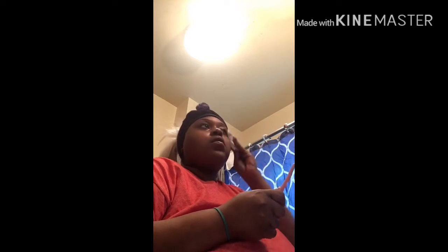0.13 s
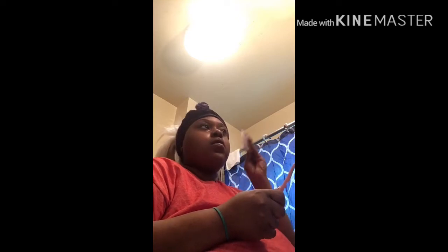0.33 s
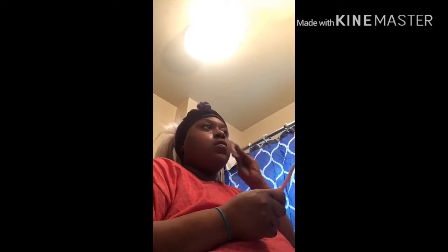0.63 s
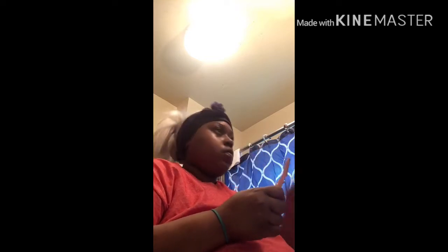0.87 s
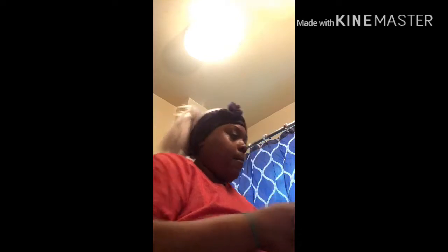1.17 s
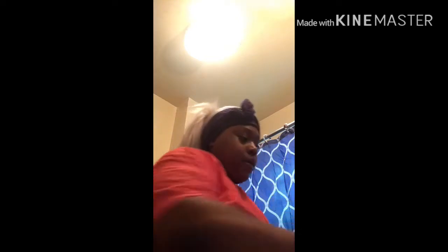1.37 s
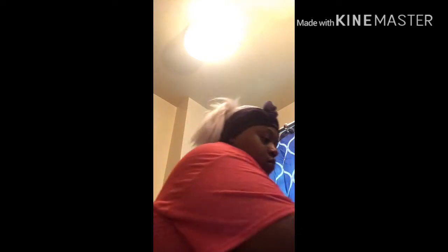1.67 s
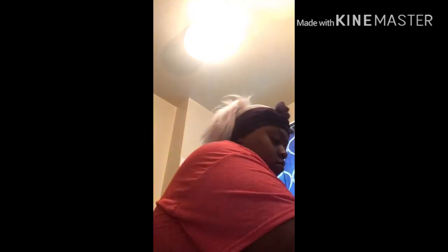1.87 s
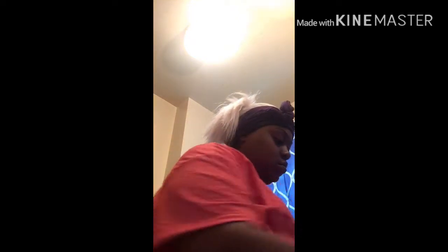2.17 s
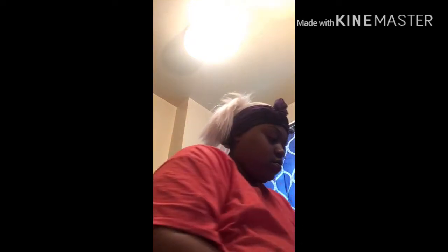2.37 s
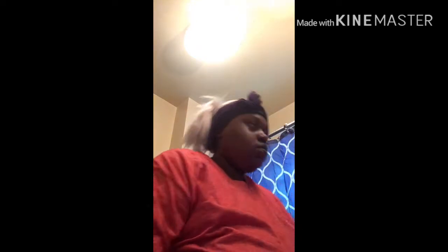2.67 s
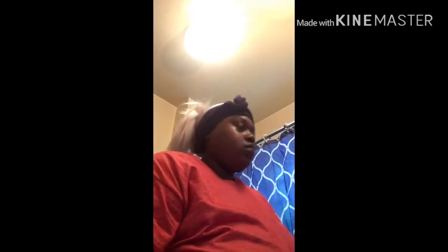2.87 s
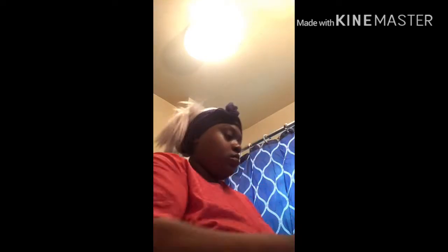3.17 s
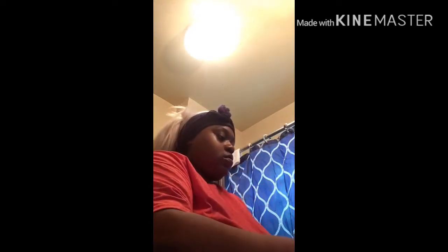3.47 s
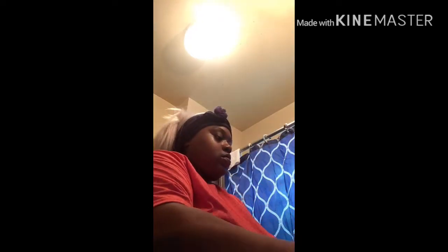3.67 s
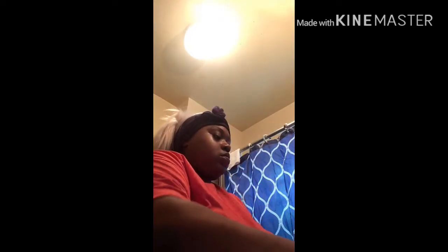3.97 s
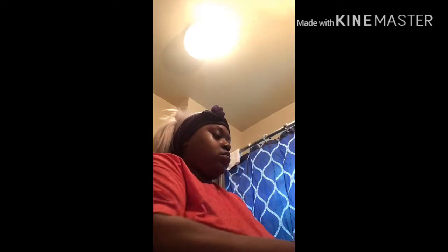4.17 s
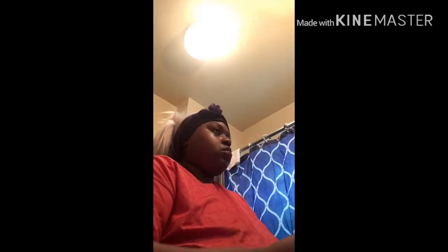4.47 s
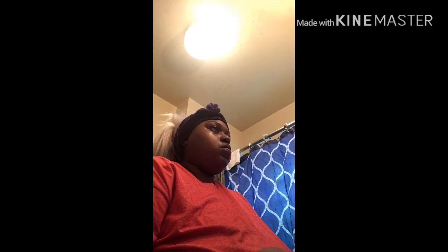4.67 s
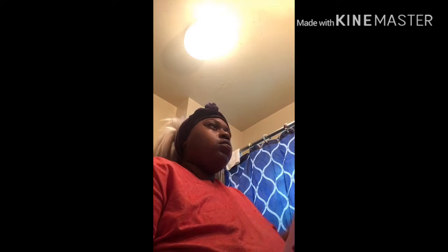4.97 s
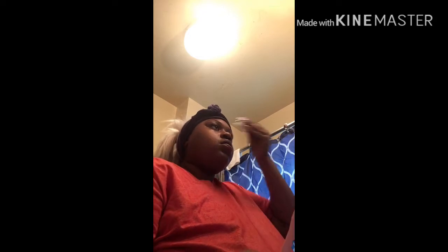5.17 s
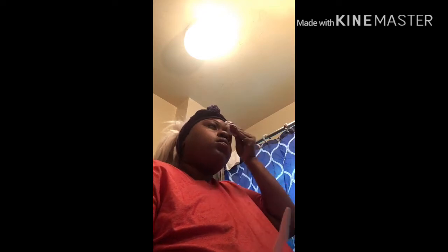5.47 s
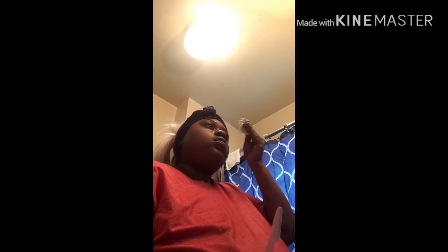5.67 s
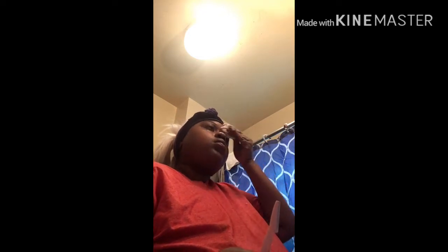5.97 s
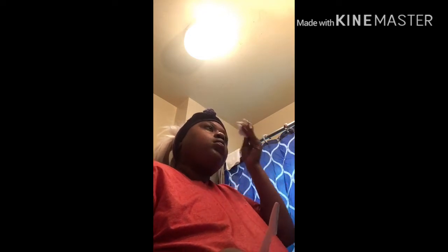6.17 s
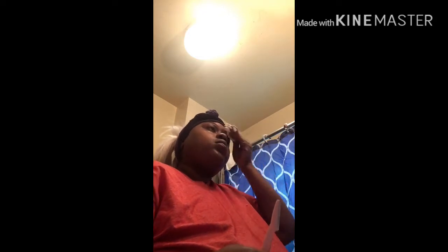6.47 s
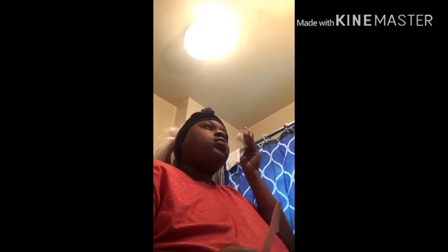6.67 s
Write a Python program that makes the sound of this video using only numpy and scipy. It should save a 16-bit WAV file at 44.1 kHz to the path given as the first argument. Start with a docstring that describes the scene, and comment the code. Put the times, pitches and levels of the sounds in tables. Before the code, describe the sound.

In a small tiled bathroom, hair is brushed twice, cloth rustles, then a rattly flush handle releases a close, hissing, bubbling rush of water.

```python
"""Two strokes of a hair brush, close by in a small tiled bathroom, then two rustles of clothes and a soft bump.
A toilet is flushed: the lever clacks and rings in a few rattling modes, the fill valve opens to a steady hiss.
Brush, rustles, hiss and rim spray are streams of tiny random impacts, each with its own colour.
The siphon takes hold: bubbles ring the hollow of the bowl, and gulps of air sound as wobbling sine pulses.
A low rumble of filtered noise lies beneath; splashes snap on top as short noise bursts with a ringing bubble."""
import sys
import numpy as np
from scipy import signal
from scipy.io import wavfile
from scipy.ndimage import uniform_filter1d

SR = 44100
rng = np.random.default_rng(int(sys.argv[2]) if len(sys.argv) > 2 else 0)


def digitize_waveform(pressure):
    """Quantize a signal to 16-bit integers and store it at the path in sys.argv[1].

    Rows of a 2-D input are taken as channels; values are limited to [-1, 1].
    """
    field = np.atleast_2d(pressure).T
    bounded = np.clip(field, -1, 1)
    quanta = np.round(bounded * 32767).astype(np.int16)
    wavfile.write(sys.argv[1], SR, quanta)


N = 300321
TIME = np.arange(N) / SR
HZ = np.fft.rfftfreq(16384, 1 / SR)

# the fill valve opens and stays open: (time [s], level of the top of its hiss [dB])
VALVE = [(1.96, -80), (2.046, -56), (2.058, -48), (2.084, -49.5), (2.2, -54), (2.5, -49.5), (6.81, -50)]
# pull of the siphon, behind the churn and the rumble of the trap: (time [s], pull [dB re a strong pull])
SIPHON = [(2.1, -52), (2.38, -22.5), (2.76, -27), (2.92, 1), (3.2, -5.5), (4.1, 3), (4.33, -0.5),
          (4.7, -2.5), (5.42, -5.5), (5.6, -8), (5.93, 0), (6.13, -5), (6.65, 3.5), (6.81, -22)]


def amp(db):
    """Decibels to gain."""
    return 10 ** (np.asarray(db) / 20)


def evened(x):
    """Scales to an rms of one."""
    return x / np.sqrt(np.mean(x ** 2) + 1e-20)


def peaked(x, db):
    """Scales to a peak level."""
    return amp(db) * x / (abs(x).max() + 1e-20)


def read(points, hz):
    """Reads a table along log frequency."""
    f, value = np.transpose(points)
    return np.interp(np.log(hz + 1), np.log(f + 1), value)


def level(rows):
    """Gain over time from a curve, silent before it starts."""
    return amp(np.interp(TIME, *np.transpose(rows), left=-900))


def band(lo_hz, hi_hz):
    """Gain curve of a steep pass band."""
    return 1 / np.sqrt((1 + (lo_hz / (HZ + 1)) ** 16) * (1 + (HZ / hi_hz) ** 16))


def response(gain):
    """The causal, minimum-phase impulse response of a gain curve, scaled to a highest gain of one."""
    log_gain = np.log(np.maximum(gain / gain.max(), 1e-5))
    circle = np.concatenate([log_gain, log_gain[-2:0:-1]])
    spectrum = np.exp(np.conj(signal.hilbert(circle)))
    return np.fft.ifft(spectrum).real[:len(HZ)]


def colour(x, gain):
    """Passes a sound through a body with this gain curve."""
    return signal.oaconvolve(x, response(gain))[:len(x)]


def add(mix, s, sound):
    """Mixes a sound in at time s."""
    part = mix[round(s * SR):][:len(sound)]
    part += sound[:len(part)]


def burst(decay, tail_db=-60, tail=.02):
    """A puff of pressure that dies within a few decay times [s], with a spatter of another decay behind it."""
    t = TIME[:len(HZ)]
    envelope = np.exp(-t / decay) + amp(tail_db) * np.exp(-t / tail)
    return rng.standard_normal(len(t)) * envelope


def grains(per_s, spread_db):
    """Random tiny impacts, most small and a few large."""
    size = amp(spread_db * np.minimum(rng.exponential(1, N), 4.5))
    sign = rng.choice([-1., 1.], N)
    strikes = rng.random(N) < per_s / SR
    return evened(size * sign * strikes)


def flutter(depth_db, span):
    """A gain that wanders at random over about span seconds, by depth_db rms."""
    size = max(int(span * SR), 2)
    wander = uniform_filter1d(uniform_filter1d(rng.standard_normal(N), size), size)
    return amp(depth_db * evened(wander))


def room(x, wet_db):
    """Adds dense reflections from the tiles, each band dying at its own speed."""
    # decay of the reflections: (frequency [Hz], time to fall 60 dB [s])
    tiles = [(200, 0.17), (800, 0.17), (2100, 0.3), (5500, 0.15), (14000, 0.14)]
    taps = rng.choice([-1., 1.], SR // 2) * (rng.random(SR // 2) < .1)
    taps *= TIME[:SR // 2] > .004  # the first reflections come after 4 ms
    hz, t, z = signal.stft(taps, SR, nperseg=256)
    decay = amp(-60 * t / read(tiles, hz)[:, None])
    tail = signal.istft(z * decay, SR, nperseg=256)[1]
    return x + amp(wet_db) * signal.fftconvolve(x, tail / np.linalg.norm(tail))[:N]


def walls(x, echo_db, count=14):
    """The nearest walls and the porcelain return a few early echoes, 2 to 20 ms late, that comb the sound."""
    taps = np.zeros(SR // 50)
    taps[rng.integers(SR // 500, len(taps), count)] = rng.choice([-1., 1.], count)
    return x + amp(echo_db) * signal.oaconvolve(x, taps / np.sqrt(count))[:N]


def plink(hz, cycles=11, rise=0.023):
    """A tiny bubble, its pitch rising as it nears the surface, dies to 1/e in some cycles."""
    age = TIME[:SR // 40] * hz / cycles  # in decay times
    tone = np.sin(2 * np.pi * cycles * age * (1 + rise * age / 2))
    return tone * np.exp(-age) * (1 - np.exp(-4 * age))


def porcelain():
    """Gain curve of the hard bowl in the treble: resonances over a flat floor."""
    # resonances of the porcelain: (frequency [Hz], half width [Hz], level re the floor [dB])
    modes = [(3517, 30, 7.5), (4030, 72, -5), (4590, 45, 8.5), (5860, 22, -6), (6170, 51, 0)]
    return 1 + sum(amp(db) / (1 + ((HZ - hz) / width) ** 2) for hz, width, db in modes)


def hollow(floor_db=-38):
    """Gain curve of the air in the bowl: resonances over a weak floor."""
    # resonances of the enclosed air: (frequency [Hz], half width [Hz], level [dB])
    modes = [(138, 4, -21), (170, 9.7, -5), (205.2, 3.8, -9.5), (277.3, 13, 0.5), (328, 10.4, -12.5),
             (386.4, 18, -13), (446, 14, -20), (546.3, 3.6, -11.5), (645.5, 8.4, 1), (918.6, 6.4, 2),
             (958, 8.8, -6), (989.5, 18.7, -4.5), (1093, 12, -7.5), (1259, 6, -13), (1356, 6.9, -18),
             (1470, 22.5, -7.5), (1540, 37, -16), (1680, 6.9, -10.5), (1848, 6.9, -6.5), (1916, 7.5, -5),
             (1974, 8, -23.5), (2064, 21, -17), (2242, 24, -15.5), (2354, 3.6, -13.5)]
    return amp(floor_db) + sum(amp(db) / (1 + ((HZ - hz) / width) ** 2) for hz, width, db in modes)


def still_air(air_db=-64, hum_hz=64, hum_width_hz=5, hum_db=-66):
    """Faint room noise with a low, wavering hum: noise through a narrow resonance."""
    # colour of the still room: (frequency [Hz], level per Hz [dB])
    air = [(15, -43), (25, -4), (48, -9.5), (72, -2), (170, -8), (461, -19), (654, -18.5), (791, -20.5),
           (4450, -30.5), (7030, -32), (10500, -40), (14600, -36), (15800, -49)]
    hum = colour(rng.standard_normal(N), 1 / (1 + ((HZ - hum_hz) / hum_width_hz) ** 2))
    hum = np.roll(hum, N // 2)  # already sounding at the start
    noise = colour(rng.standard_normal(N), amp(read(air, HZ)))
    return amp(air_db) * evened(noise) + amp(hum_db) * evened(hum)


def drain(drain_db=-56.5, follow=0.16, tilt_db=7):
    """Water tumbling down the trap gives a lumpy low rumble, stronger by tilt_db an octave upwards."""
    gain = band(88, 171) * amp(tilt_db * np.log2(HZ + 1))
    rumble = colour(rng.standard_normal(N), gain) * flutter(depth_db=4.0, span=0.39)
    return amp(drain_db) * level(SIPHON) ** follow * evened(rumble)  # follow: dB per dB of siphon


def brush_and_clothes(body_db=0.8, fizz_db=-1):
    """Bristles on hair, then clothes, slip in tiny flicks; each movement lands, swells mid-way and lifts off."""
    # two brush strokes, then two rustles of clothes:
    # (time [s], length [s], level before swell and trim [dB], fine fizz before arch and trim [dB])
    movements = [(0.109, 0.22, -60.5, -58), (0.591, 0.14, -60.5, -59), (1.098, 0.18, -68.5, -58.5),
                 (1.468, 0.14, -69, -71)]
    # colour of the flicks: (frequency [Hz], level per Hz [dB])
    flick_colour = [(350, -39), (600, -7), (845, -33), (892, -14), (1290, -5.5), (2740, 0.5), (3370, -2.5),
                    (4310, -0.5), (8190, -23), (15800, -29.5)]
    attack_s, release_s, swell_db, arch_db = 0.0091, 0.055, 5, 11
    rustle_from_s, rustle_db, rustle_fizz_db = 0.64, -72.5, -74  # levels before trim

    flicks = grains(per_s=8900, spread_db=1.5) * flutter(depth_db=0.7, span=0.0088)
    gain = amp(read(flick_colour, HZ))
    # faint rustling goes on from 0.64 s
    moving = np.clip((TIME - rustle_from_s) / release_s, 0, 1)
    body, fizz = amp(rustle_db) * moving, amp(rustle_fizz_db) * moving
    for s, length, db, fine_db in movements:
        t = TIME - s
        contact = np.clip(t / attack_s, 0, 1) * np.exp(-np.maximum(t - length, 0) / release_s)
        speed = np.sin(np.pi * np.clip(t / (length + 2 * release_s), 0, 1))
        body = np.hypot(body, amp(db + swell_db * (speed - 1)) * contact)
        fizz = np.hypot(fizz, amp(fine_db + arch_db * (speed - 1.5)) * contact)
    body = amp(body_db) * body * evened(colour(flicks, gain * band(640, 5100)))
    fizz = amp(fizz_db) * fizz * evened(colour(flicks[::-1], gain * band(5850, 18000)))
    return (body + fizz) * (TIME < VALVE[0][0])  # silent once the valve's curve begins


def knock(hz, octaves=0.85):
    """Gain curve of a dull, soft blow centred on one pitch."""
    return band(0.35 * hz, 8.2 * hz) / (1 + (np.log2((HZ + 1) / hz) / octaves) ** 2)


def thump(hz, ring_s=0.0063, puff_db=1, body_db=-4):
    """A soft blow: a dull puff over a few cycles of low body, their levels relative to each other."""
    t = TIME[:len(HZ)]
    body = np.sin(2 * np.pi * hz * t) * (1 - np.exp(-t * hz)) * np.exp(-t / ring_s)
    puff = colour(burst(decay=0.027), knock(hz))
    return peaked(puff, puff_db) + peaked(body, body_db)


def handling(tap_db=-2):
    """Soft bumps of a body turning round, a sleeve brushing past and dry taps, all short puffs of noise or body."""
    # soft bumps: (time [s], peak before the room [dB], pitch [Hz])
    bumps = [(1.112, -42, 247), (1.15, -48, 116)]
    # the sleeve: (time [s], peak before the room [dB])
    sleeve = [(1.481, -51.5)]
    # colour of the cloth: (frequency [Hz], level per Hz [dB])
    cloth = [(100, -19), (450, 1), (1000, -7), (1600, -5), (2300, -12), (6000, -30)]
    # the brush landing and the valve cracking open: (time [s], peak before trim and room [dB])
    taps = [(0.119, -55), (0.6, -45), (2.056, -30.5)]
    out = np.zeros(N)
    for s, db, hz in bumps:
        add(out, s, peaked(thump(hz), db))
    for s, db in sleeve:
        add(out, s, peaked(colour(burst(decay=0.033), amp(read(cloth, HZ))), db))
    for s, db in taps:
        add(out, s, peaked(colour(burst(decay=0.01), band(2300, 7500)), db + tap_db))
    return room(out, wet_db=-6)


def fill_valve():
    """Mains water hisses through the narrow valve into the tank: dense tiny impacts with early echoes."""
    # colour of the hiss: (frequency [Hz], level per Hz [dB])
    hiss = [(150, -45.5), (260, -3), (379, -11), (535, -13.5), (692, -9), (1030, -16), (1500, -0.5),
            (2100, -7), (2560, -7), (2880, -12), (4280, -4.5), (4750, -11), (6930, -9), (8080, -11.5),
            (9800, -12), (10450, -15.5), (11000, -11), (14500, -14), (15800, -14)]
    jet = walls(colour(grains(per_s=20000, spread_db=4.0), amp(read(hiss, HZ))), echo_db=-8.5)
    top = np.std(colour(jet, band(8000, 15000)))  # the part whose level the valve curve gives
    return level(VALVE) * jet / top * flutter(depth_db=1.37, span=0.0054)


def lever(clack_db=-4, ring_db=-15, ring_rise_s=0.0018, rattle_hz=26):
    """The lever clacks against its stop; it sits loose, so its brief ring is smeared by rattling."""
    # the flush lever: (time [s], peak before trims and room [dB])
    strikes = [(1.847, -24)]
    # its ringing: (frequency [Hz], relative level [dB], time to fall 60 dB [s])
    modes = [(585, -17, 0.12), (1460, -6, 0.19), (1980, -13, 0.16), (2640, 1, 0.07), (3070, -7, 0.21),
             (3090, -1, 0.13), (3640, -10, 0.11)]
    # colour of the clack: (frequency [Hz], level per Hz [dB])
    clack_colour = [(180, -41), (550, -7), (1200, -13), (1500, -5.5), (2000, -0.5), (2400, -8), (2700, 0),
                    (3100, 4.5), (3350, -6), (4000, -10), (5800, -6), (6600, -11), (7300, -13),
                    (15800, -23)]
    out, t = np.zeros(N), TIME[:len(HZ)]
    ring = np.zeros(len(t))
    for hz, db, t60 in modes:
        pitch = hz + rattle_hz * evened(uniform_filter1d(rng.standard_normal(len(t)), size=150))
        ring += amp(db - 60 * t / t60) * np.sin(2 * np.pi * np.cumsum(pitch) / SR)
    ring *= 1 - np.exp(-t / ring_rise_s)
    clack = colour(burst(decay=0.0044, tail_db=-11, tail=0.036), amp(read(clack_colour, HZ)))
    for s, db in strikes:
        add(out, s, peaked(clack, db + clack_db) + peaked(ring, db + ring_db))
    return room(out, wet_db=-7)


def rim_spray(wash_db=-3.0, drops_db=-7):
    """Rim jets patter on porcelain: a wash, and a fine crackle of droplets that ring briefly at 24 pitches."""
    # flow from the jets: (time [s], level before the wash and drops trims [dB])
    flow = [(2.18, -51), (2.25, -46), (2.48, -43), (2.76, -41.5), (2.95, -40), (3.3, -44), (3.55, -39.5),
            (3.75, -43), (4.0, -40.5), (4.38, -44), (4.7, -41.5), (5.3, -43), (6.81, -43.5)]
    # colour of the spray: (frequency [Hz], level per Hz [dB])
    spray_colour = [(1290, -34), (2200, -1), (2500, -28), (2690, 2), (3320, 3.5), (3460, -8.5), (3760, -1),
                    (4090, 3.5), (4600, -0.5), (4930, 0), (6100, 2.5), (6700, -8), (9000, -27),
                    (11700, -28), (19800, -120)]
    wash = colour(grains(per_s=5500, spread_db=1.5), amp(read(spray_colour, HZ)) * porcelain())
    wash = wash * flutter(depth_db=4.5, span=0.0092)
    drops = np.zeros(N)
    for hz in np.geomspace(3200, 6600, 24):
        ringing = signal.oaconvolve(grains(per_s=38, spread_db=4.0), plink(hz, cycles=3.2))[:N]
        drops += ringing * amp(read(spray_colour, hz))
    wash = amp(wash_db) * evened(walls(wash, echo_db=4))
    drops = amp(drops_db) * evened(colour(drops, porcelain()))
    return level(flow) * (wash + drops)


def churn(drift_depth=0.001486, pop_damping=0.086, surge_s=0.042):
    """Countless bubbles ring the bowl, surging with the siphon under a froth of small ones."""
    # bubble sizes, large to small: (lowest [Hz], highest [Hz], level at 0 dB of siphon [dB],
    # follow [dB per dB of siphon], depth of the random surges [dB])
    bubbles = [(149, 645, -41.5, 0.53, 2.4), (518, 778, -47, 0.57, 5), (810, 1110, -49, 0.3, 2.5)]
    # froth of small bubbles: (time [s], level [dB])
    froth = [(2.05, -68), (2.065, -51), (2.22, -49.5), (2.25, -46.5), (2.33, -49.5), (2.76, -52.5),
             (2.93, -39.5), (3.05, -54), (3.3, -44), (3.85, -45), (4.24, -42.5), (4.4, -48.5), (5.0, -46.5),
             (5.45, -44), (5.65, -52), (6.0, -43), (6.15, -48), (6.6, -44), (6.81, -48)]
    # the pitches drift slightly at random; drift_depth is the rms fraction
    drift = np.cumsum(drift_depth * evened(uniform_filter1d(rng.standard_normal(N), size=2500))) / SR

    def bubbling(lo_hz, hi_hz, depth):
        """Pops in one range of sizes, ringing more the deeper they lie; the pitches drift slightly at random."""
        ring = response(hollow() ** depth * band(lo_hz, hi_hz)) * np.exp(-TIME[:len(HZ)] / pop_damping)
        pops = signal.oaconvolve(grains(per_s=600, spread_db=1.5), ring)[:N]
        return np.interp(TIME + drift, TIME, pops)

    small = bubbling(1310, 2700, depth=0.79) * flutter(depth_db=2.5, span=0.03)
    out = level(froth) * evened(small)
    for lo_hz, hi_hz, db, follow, surge_db in bubbles:
        surging = bubbling(lo_hz, hi_hz, depth=0.94) * flutter(surge_db, surge_s)
        out += amp(db) * level(SIPHON) ** follow * evened(surging)
    return out


def splashes(trim_db=-4.5, octaves=0.91, plink_db=-5, spit_db=-2, spatter_db=-2, slap_db=-11, slap_hz=2130):
    """Water slaps shut: a snap, a spatter, a ringing bubble, a spit of fine drops; hard ones smack the porcelain."""
    # splashes: (time [s], level before trims [dB], pitch [Hz], level of the fine spit before trim [dB])
    rows = [(2.242, -29.5, 4470, -46), (2.281, -26, 4500, -46), (2.335, -27, 3880, -54),
            (2.361, -24.5, 4350, -53), (2.4105, -23.5, 4400, -32), (2.454, -19.5, 4400, -44),
            (2.527, -28, 4200, -50), (2.685, -22, 4400, -62), (2.829, -22, 4350, -39),
            (2.471, -24, 6460, -37), (2.605, -30.5, 5930, -34), (3.021, -28, 4230, -59),
            (3.105, -26, 4050, -35), (3.203, -32, 3900, -51), (3.298, -26, 4300, -50),
            (3.408, -24.5, 4100, -51), (3.5121, -16, 4370, -35), (3.603, -26, 4090, -35),
            (3.8055, -21, 3880, -47), (3.793, -36, 6100, -52), (3.972, -17, 5900, -40),
            (4.117, -21, 3930, -49), (4.1447, -30, 4220, -56), (4.2063, -25, 3800, -33),
            (4.624, -24, 4160, -52), (4.6777, -24, 4560, -47), (4.7585, -29, 3400, -44),
            (4.818, -39, 6140, -54), (4.8326, -14, 4330, -36), (5.5266, -25, 5900, -38),
            (5.7335, -36, 4700, -28), (5.956, -23, 6100, -45), (6.2746, -29.5, 3700, -40),
            (6.476, -23, 5950, -36), (6.6092, -16.5, 4330, -39)]
    out, hardest_db = np.zeros(N), max(row[1] for row in rows)
    for s, db, hz, fine_db in rows:
        gain = porcelain() * band(2800, 7200) / (1 + (np.log2((HZ + 1) / hz) / octaves) ** 2)
        snap = colour(burst(decay=0.0021), gain)
        spatter = colour(burst(decay=0.012), gain)
        spit = colour(burst(decay=0.01), band(7800, 11400))
        smack = colour(burst(decay=0.0044), 1 / (1 + ((HZ - slap_hz) / 450) ** 2))
        add(out, s, peaked(snap, db + trim_db))
        add(out, s, peaked(spatter, (db + fine_db) / 2 + spatter_db))
        add(out, s, peaked(plink(hz, cycles=5.4), db + plink_db))
        add(out, s, peaked(spit, fine_db + spit_db))
        add(out, s, peaked(smack, db + slap_db + 4.0 * (db - hardest_db)))  # fades fast in softer splashes
    return room(out, wet_db=-5.0)


def glug(hz, glide_per_s, wobble=0.024, size_spread=0.17):
    """A large bubble swells and dies at its own pitch, wobbling in shape; the pitch glides a little up or down."""
    swell_s, usual_ring_s = 0.0041, 0.016
    t = TIME[:len(HZ)]
    ring_chance, glide_chance = rng.uniform(-1, 1, 2)
    ring_s = usual_ring_s * np.exp(size_spread * ring_chance)
    glide = glide_per_s * glide_chance
    shape = wobble * evened(uniform_filter1d(rng.standard_normal(len(t)), size=300))
    pitch = hz * (1 + glide * (t - ring_s) + shape)
    return np.sin(2 * np.pi * np.cumsum(pitch) / SR) * (1 - np.exp(-t / swell_s)) * np.exp(-t / ring_s)


def gulps(pocket_trim_db=-3, shed_trim_db=-3, slop_db=-1.0, slop_growth=0.18, pop_db=-1.5, pop_octaves=0.22):
    """Air gulps through the trap: a pocket rings, sheds a bubble and slops the water; clusters burst on top."""
    # gulps: (time [s], level of the air pocket before trim [dB], level of the bubble it sheds before trim [dB],
    # pitch of the pocket [Hz], pitch of the bubble [Hz])
    glugs = [(2.477, -22.5, -31.5, 313, 642), (2.495, -25.5, -46, 298, 656), (2.575, -29, -36, 306, 648),
             (2.605, -24.5, -42, 276, 674), (2.624, -18.5, -49, 282.5, 626), (2.666, -38, -45, 277.3, 690),
             (2.681, -26, -51, 294, 677), (2.861, -26, -31, 307, 612), (2.88, -22.5, -31, 308, 652),
             (2.902, -34, -35, 277, 643), (2.931, -31.5, -39, 310, 650), (2.958, -30, -62, 280, 640),
             (2.971, -52, -29.5, 300, 664), (2.991, -27, -57, 286, 640), (3.047, -32, -56, 282, 684),
             (3.139, -29, -29, 297, 646), (3.151, -36, -35, 269, 672), (3.173, -34.5, -48, 258, 644),
             (3.322, -29, -37, 262, 610), (3.341, -29.5, -36, 274, 680), (3.371, -26.5, -21.5, 288, 635),
             (3.405, -36, -52, 272, 690), (3.442, -25, -43, 278, 630), (3.534, -29, -32.5, 272, 646),
             (3.568, -28, -28.5, 298, 641.5), (3.629, -30, -53, 275, 630), (3.68, -22.5, -27, 288, 649),
             (3.696, -34, -40, 295, 630), (3.741, -24, -40, 276, 647), (3.79, -31.5, -28, 277, 656),
             (3.854, -26.5, -45, 270.5, 615), (3.946, -22, -43, 280, 638), (3.97, -23, -43, 295, 620),
             (4.032, -24, -39, 307, 596), (4.057, -25, -24, 279, 640), (4.069, -43, -21.5, 304, 640),
             (4.345, -30.5, -38, 279, 650), (4.396, -38, -31, 276, 657), (4.468, -32, -28.5, 294, 665),
             (4.503, -30, -36, 307, 615), (4.528, -36, -27.5, 290, 652), (4.679, -35, -27.5, 323, 640),
             (4.724, -35, -48, 287, 676), (4.831, -29.5, -28.5, 325, 665), (4.878, -35, -34, 290, 630),
             (4.981, -26, -64, 313, 663), (5.072, -32.5, -34.5, 313, 644), (5.153, -28.5, -31, 301, 653),
             (5.175, -33, -32, 342, 625), (5.258, -55, -33, 320, 644), (5.35, -53, -30.5, 260, 643),
             (5.401, -26, -34.5, 278, 666), (5.528, -27.5, -65, 285, 676), (5.751, -41, -31, 277, 660),
             (5.851, -49, -33, 285, 649), (5.892, -26.5, -34, 323, 662), (5.919, -52, -32, 338, 658),
             (5.961, -34.5, -32, 310, 644), (6.229, -29.5, -44, 281, 680), (6.274, -28.5, -33, 304, 659),
             (6.386, -30.5, -39, 259, 638), (6.419, -41, -32, 260, 653), (6.453, -34, -31, 330, 667),
             (6.469, -51, -23.5, 310, 656), (6.521, -28.5, -49, 333, 680), (6.533, -44, -34, 328, 648),
             (6.563, -56, -24, 303, 654), (6.673, -48, -31.5, 318, 650), (6.693, -31, -32, 331, 676),
             (6.727, -29, -46, 326, 650)]
    # small bubbles bursting in clusters at the surface: (time [s], level before trim [dB], pitch [Hz])
    pops = [(2.469, -29.5, 930), (2.4686, -23.5, 1450), (2.49, -33, 1860), (2.62, -23.5, 1940),
            (2.622, -34, 2200), (2.624, -31.5, 1530), (2.816, -44.5, 980), (2.877, -30.5, 920),
            (2.915, -32, 1860), (2.965, -38, 935), (3.087, -30, 1500), (3.09, -38, 1820),
            (3.139, -29.5, 1810), (3.142, -34, 920), (3.168, -32, 945), (3.266, -37, 1540),
            (3.318, -30, 2270), (3.371, -24, 964), (3.399, -35, 1040), (3.515, -34, 1520),
            (3.684, -32, 1440), (4.058, -24.5, 1010), (4.06, -26.5, 1460), (4.191, -31, 1600),
            (4.215, -30, 1800), (4.686, -32.5, 1020), (4.764, -33, 970), (4.88, -33.5, 1480),
            (5.136, -30.5, 970), (5.14, -31, 1610), (5.388, -33, 970), (5.439, -31.5, 1950),
            (5.961, -27.5, 980), (6.14, -34.5, 910), (6.408, -31, 1490), (6.411, -34, 980),
            (6.471, -33.5, 1500), (6.612, -29, 1950)]
    out, slop = np.zeros(N), response(hollow() ** 0.62 * band(170, 693))
    usual_db = np.mean([row[1:3] for row in glugs])
    for s, pocket_db, shed_db, pocket_hz, shed_hz in glugs:
        size_db = (pocket_db + shed_db) / 2
        add(out, s, peaked(glug(pocket_hz, glide_per_s=0.23), pocket_db + pocket_trim_db))
        add(out, s, peaked(glug(shed_hz, glide_per_s=0.05, wobble=0.01), shed_db + shed_trim_db))
        slopping = signal.fftconvolve(burst(decay=0.018), slop)
        growth_db = slop_growth * (size_db - usual_db)  # big gulps slop the most
        add(out, s, peaked(slopping, size_db + slop_db + growth_db))
    for s, db, hz in pops:
        gain = hollow() ** 0.66 * band(834, 2350) / (1 + (np.log2((HZ + 1) / hz) / pop_octaves) ** 2)
        cluster = colour(burst(decay=0.008, tail_db=-18.5, tail=0.031), gain)
        add(out, s, peaked(cluster, db + pop_db))
    return room(out, wet_db=-5.5)


def scene():
    """Everything in the bathroom, heard from beside the toilet."""
    before = still_air() + brush_and_clothes() + handling() + lever()
    water = drain() + fill_valve() + rim_spray() + churn() + splashes() + gulps()
    return (before + water)[None]


def record(dry, edge_hz=15900):
    """The band limit of the recorder behind the microphone: a steep low-pass."""
    low_pass = signal.firwin(511, edge_hz, window=("kaiser", 9), fs=SR)
    return signal.oaconvolve(dry, low_pass[None], "same")


dry = scene()
out = record(dry)
digitize_waveform(out)
```